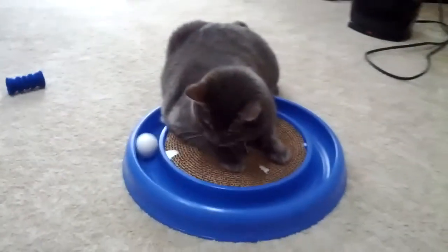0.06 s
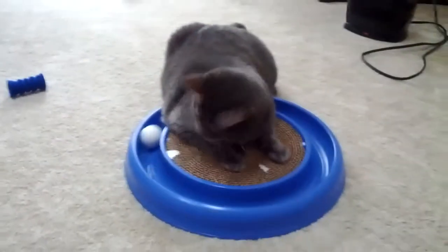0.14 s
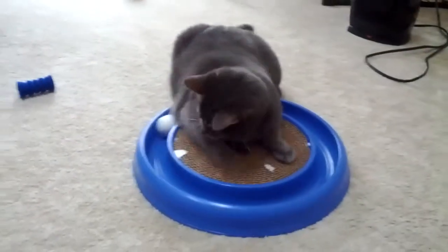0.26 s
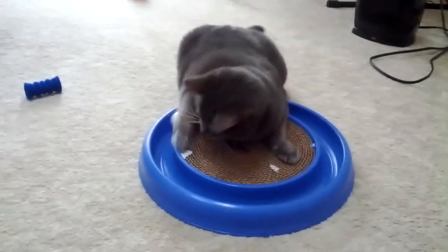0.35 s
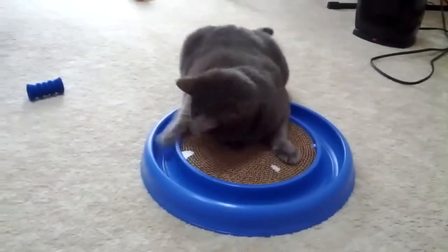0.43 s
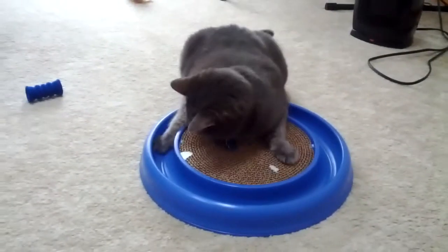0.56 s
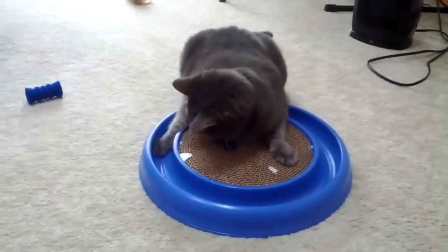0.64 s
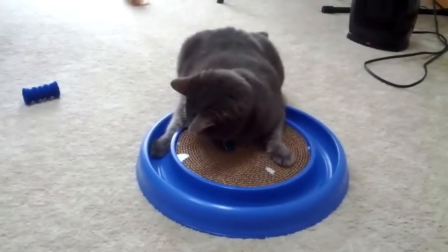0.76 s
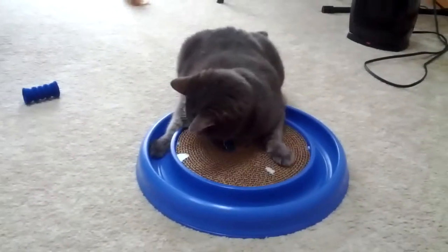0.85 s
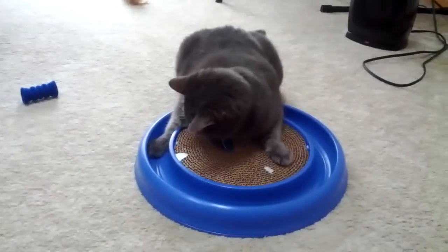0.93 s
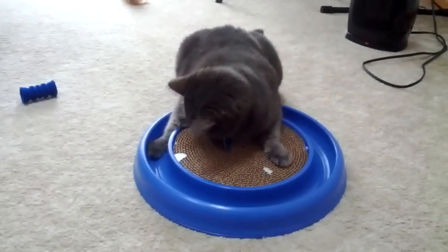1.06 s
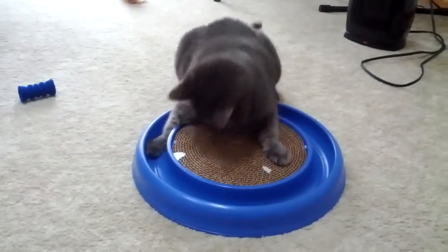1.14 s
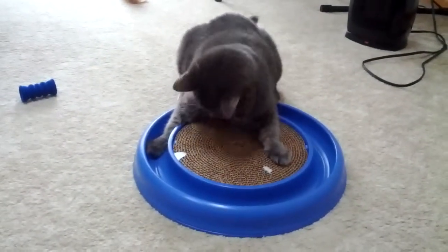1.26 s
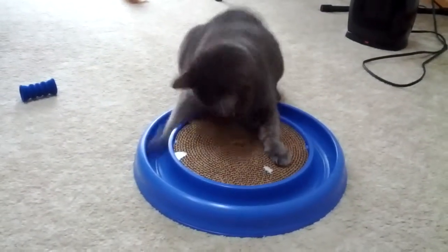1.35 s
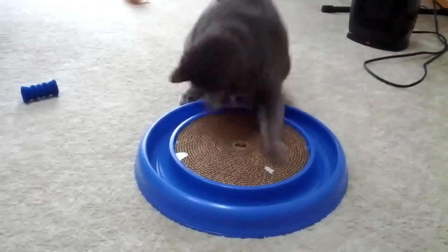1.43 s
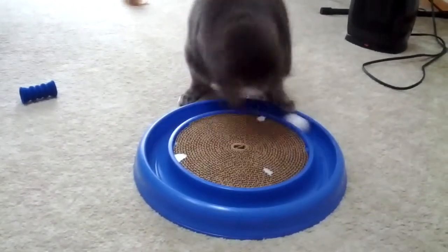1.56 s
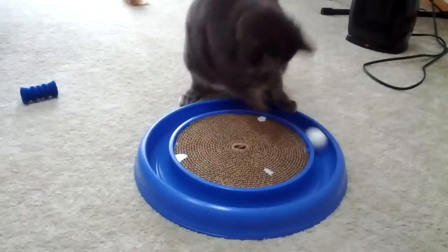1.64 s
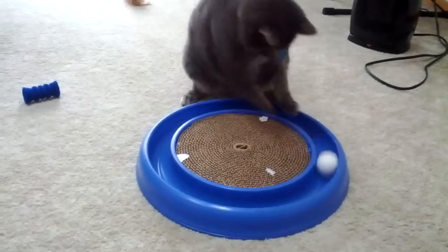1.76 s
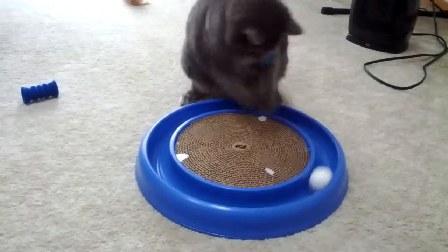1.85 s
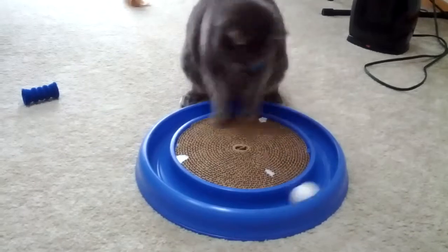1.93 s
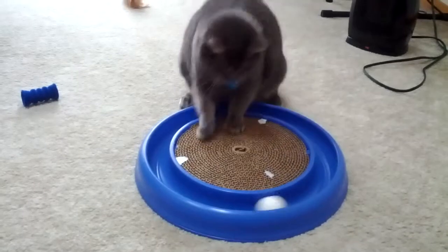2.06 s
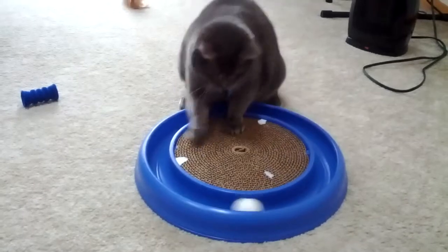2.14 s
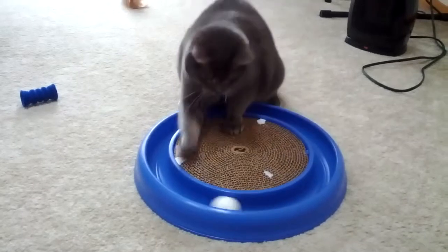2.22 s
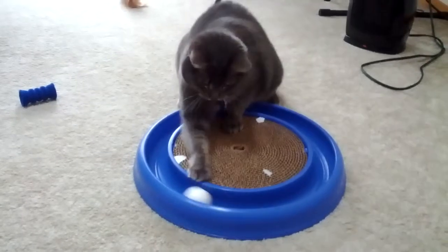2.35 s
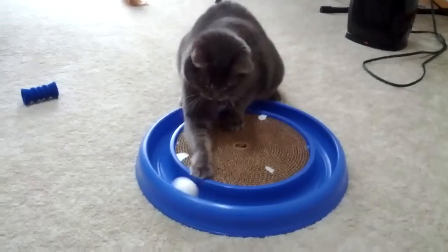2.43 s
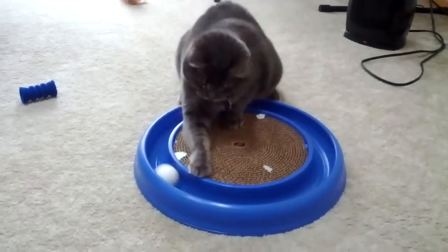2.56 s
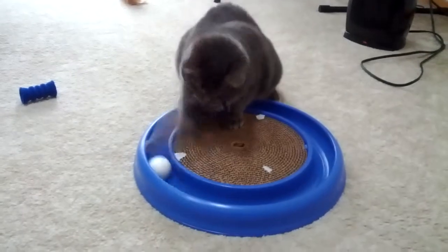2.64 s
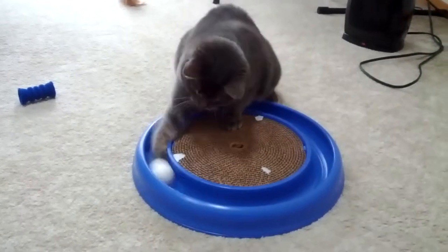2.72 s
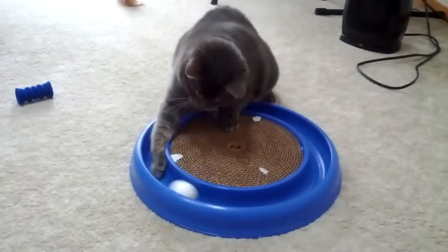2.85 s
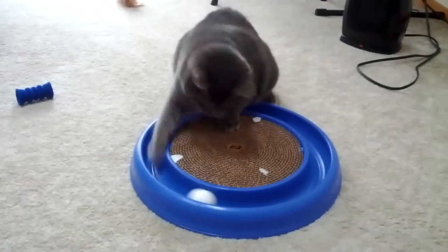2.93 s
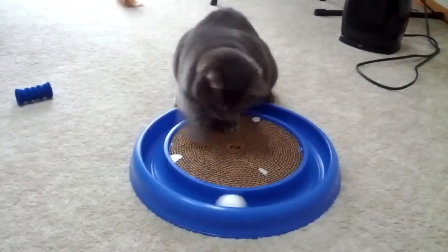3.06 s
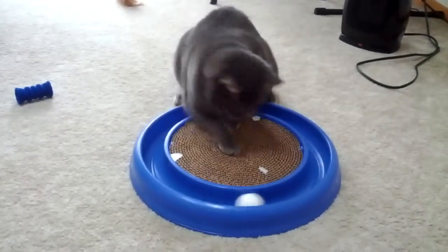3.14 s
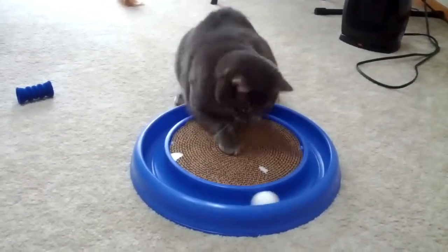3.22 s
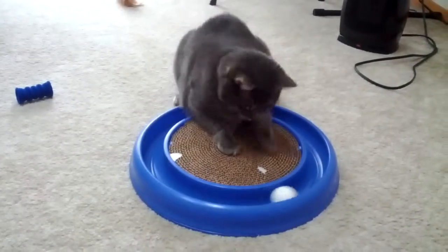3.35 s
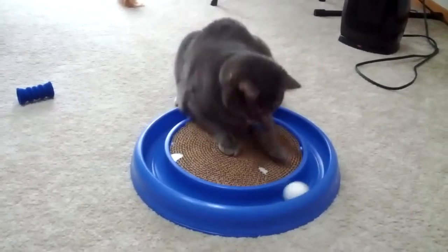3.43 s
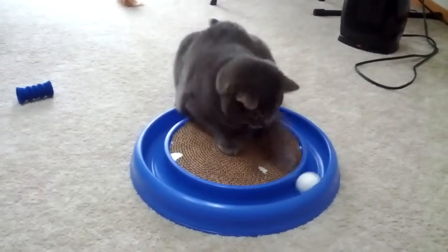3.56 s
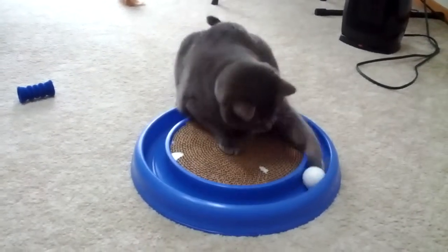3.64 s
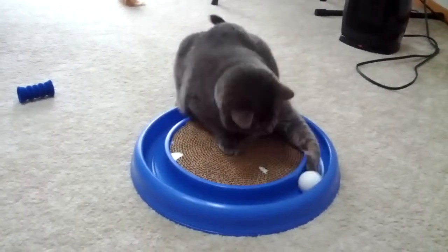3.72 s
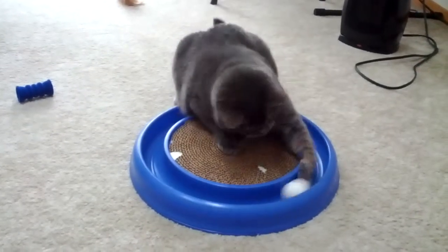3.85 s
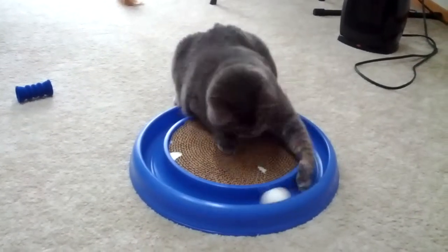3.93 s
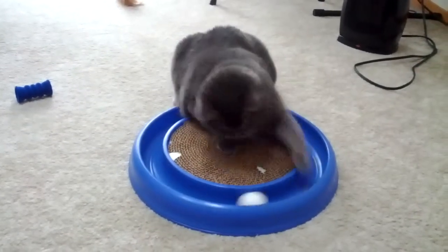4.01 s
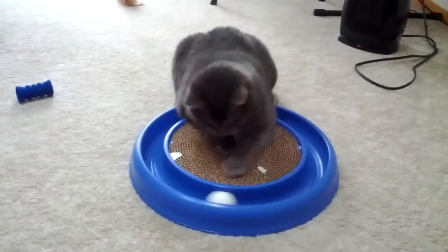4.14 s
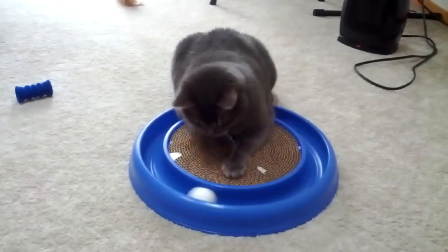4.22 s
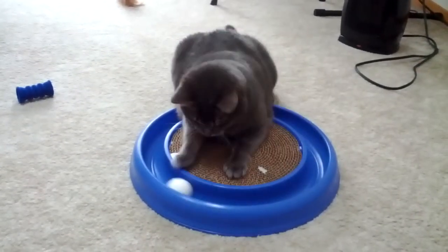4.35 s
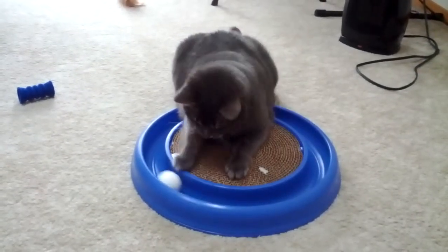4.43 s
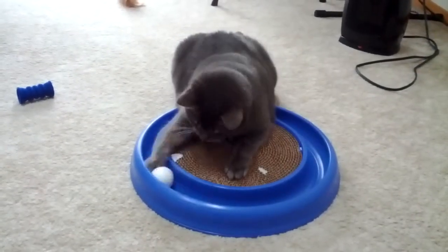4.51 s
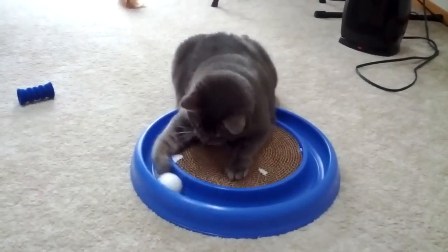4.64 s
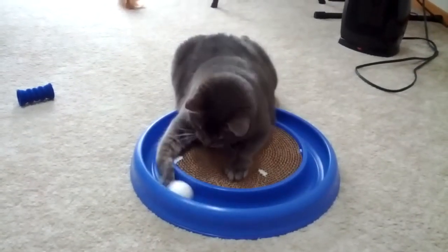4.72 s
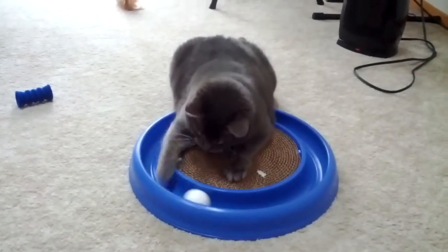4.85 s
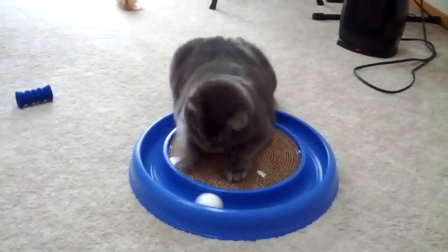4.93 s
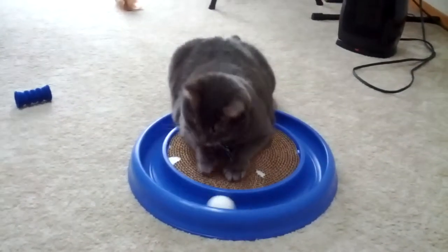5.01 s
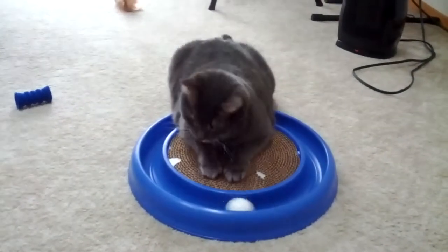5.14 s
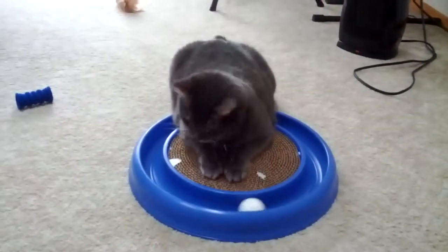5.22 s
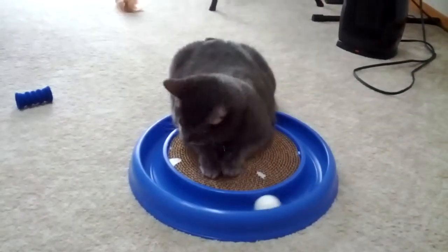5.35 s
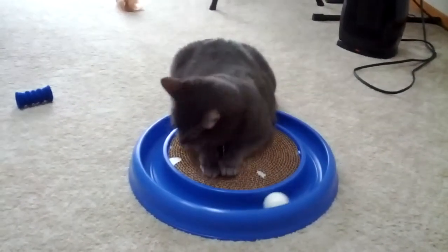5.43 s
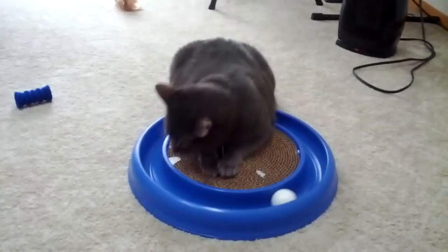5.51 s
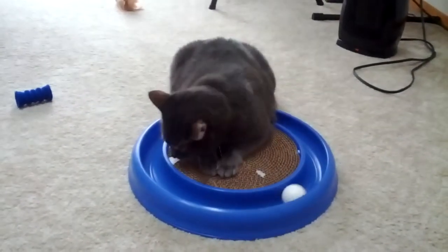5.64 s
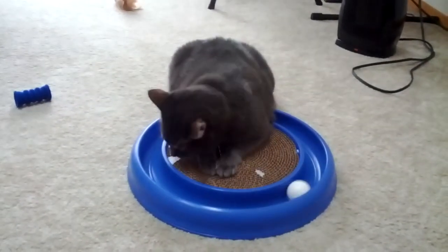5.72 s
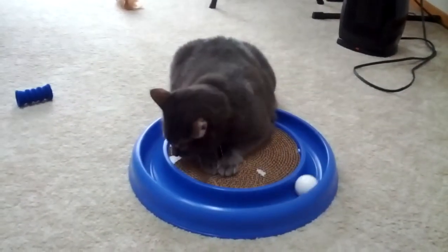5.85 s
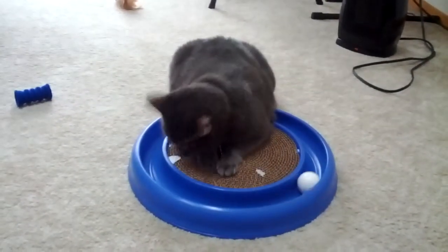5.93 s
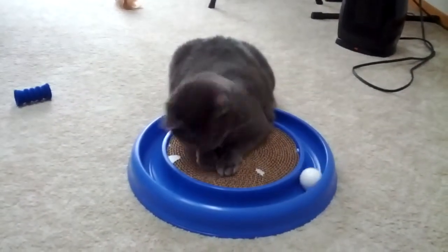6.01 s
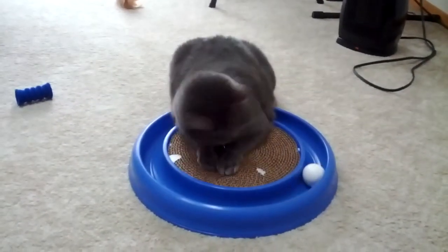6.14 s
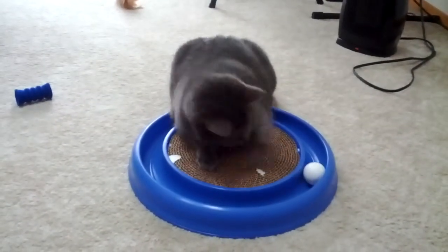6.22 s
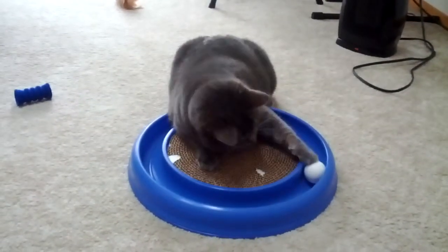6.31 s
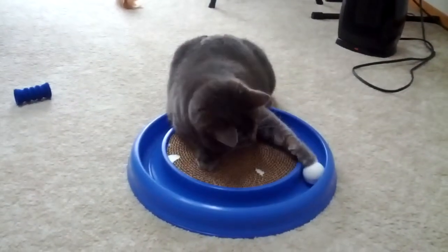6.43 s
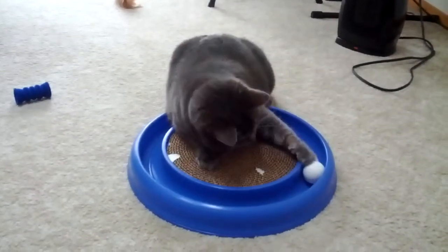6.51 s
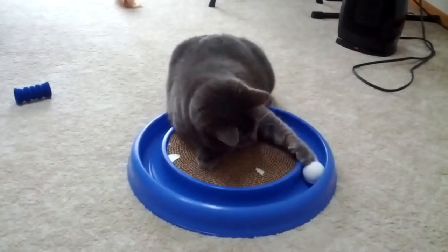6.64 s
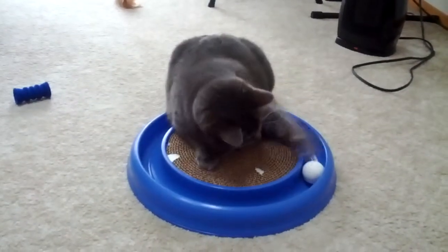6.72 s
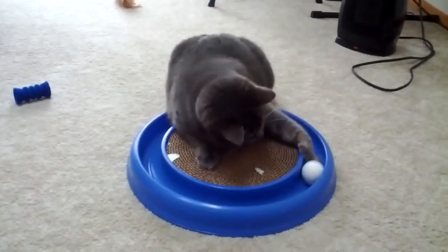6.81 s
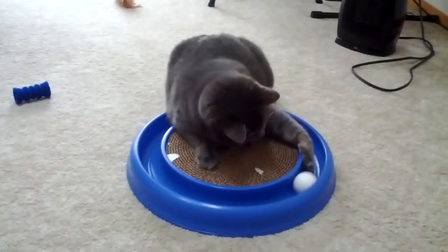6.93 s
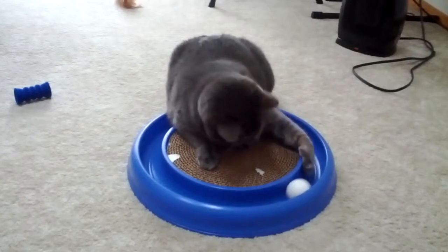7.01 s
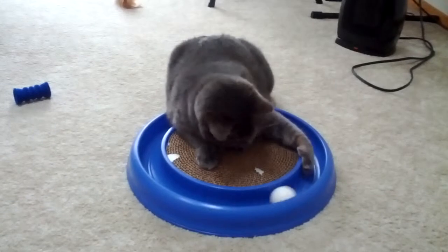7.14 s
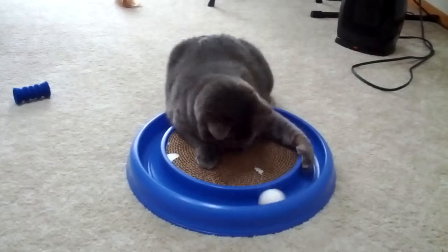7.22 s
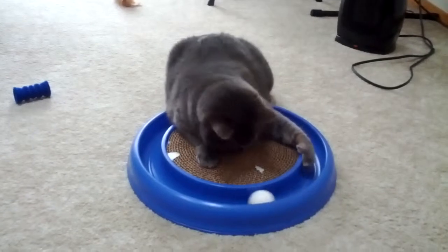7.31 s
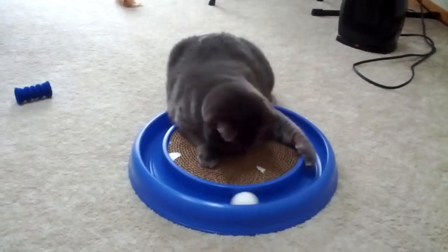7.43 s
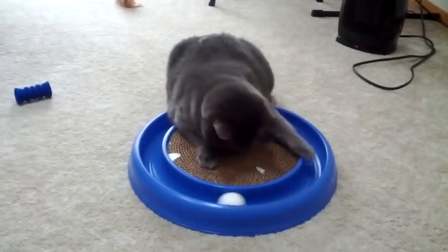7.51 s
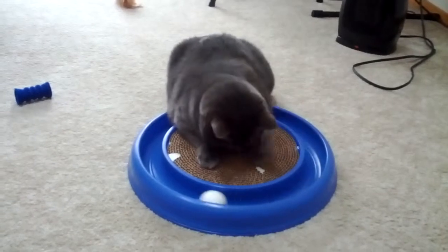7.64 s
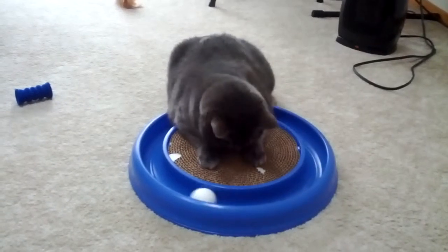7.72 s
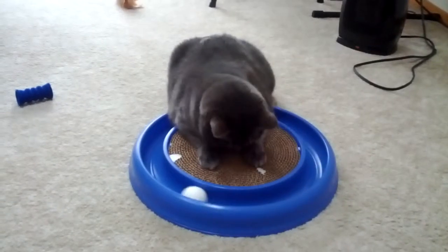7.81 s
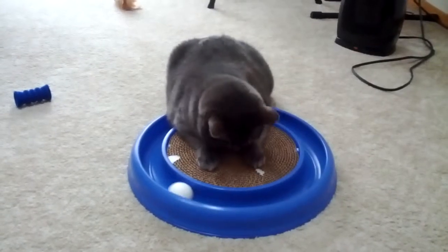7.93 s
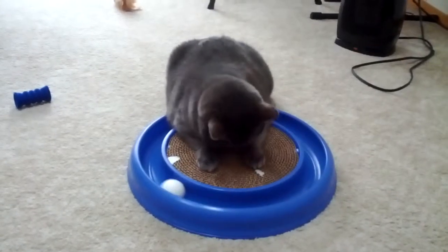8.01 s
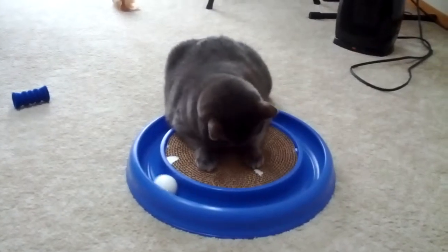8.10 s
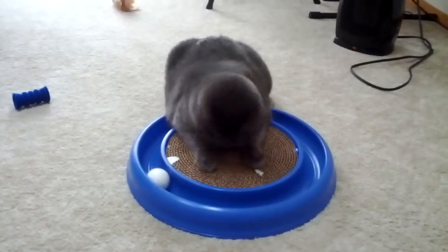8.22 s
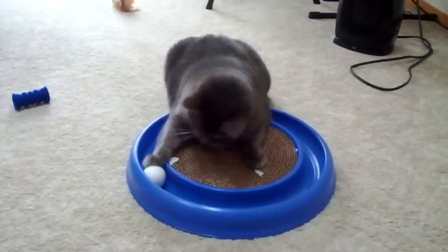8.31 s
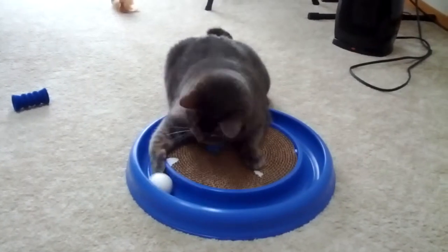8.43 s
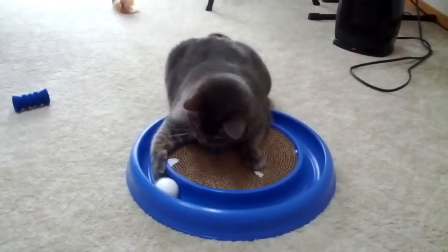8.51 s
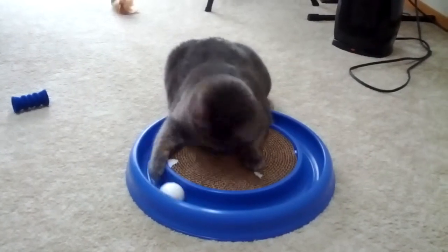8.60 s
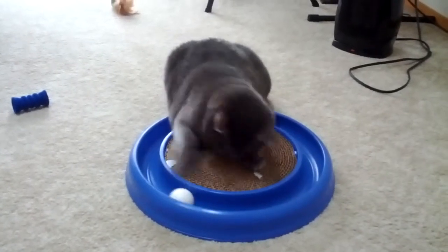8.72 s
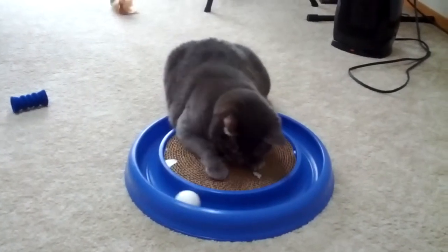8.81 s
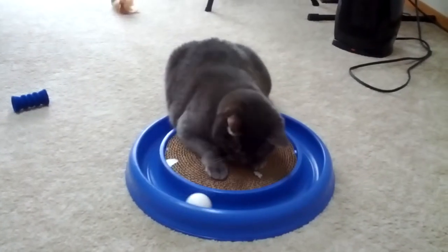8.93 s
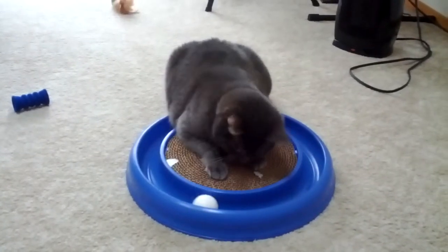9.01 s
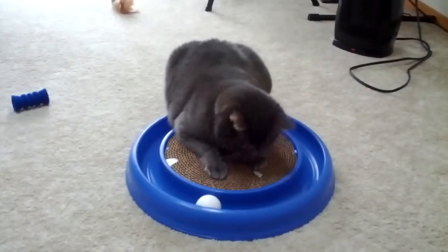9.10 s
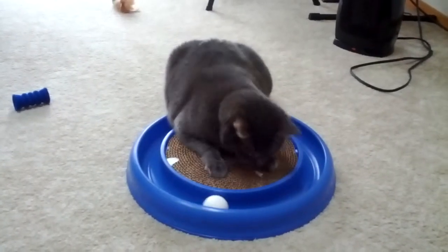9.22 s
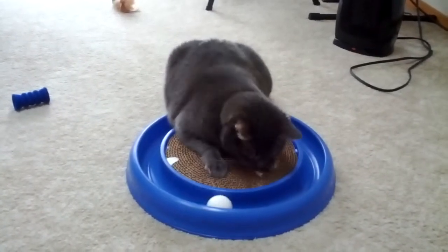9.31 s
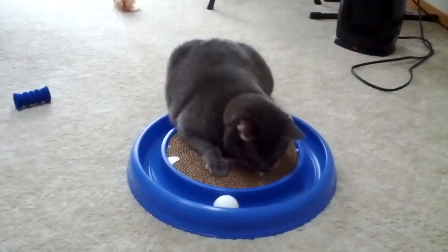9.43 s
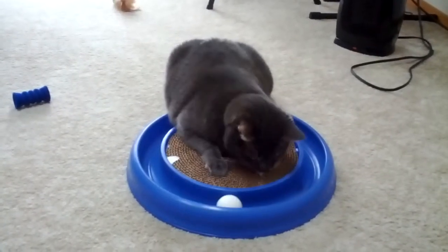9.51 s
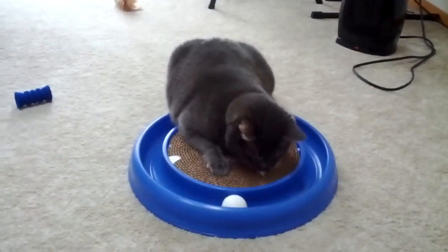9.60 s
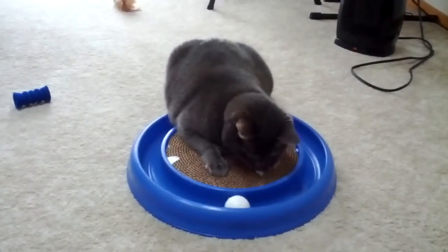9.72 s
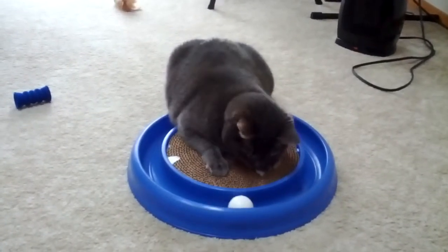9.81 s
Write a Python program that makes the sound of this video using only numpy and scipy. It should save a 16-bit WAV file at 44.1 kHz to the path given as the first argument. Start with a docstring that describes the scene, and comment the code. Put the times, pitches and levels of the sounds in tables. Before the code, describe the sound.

A quiet carpeted room with low steady air noise, very faint hum and short echo; one close microphone. A hollow plastic ball is already rolling in a ring-shaped plastic tray. A loud clack at 0.1 s starts a short run that is stopped by 0.4 s, then near quiet with faint paw brushes. At 1.4 s a hard swat brings a cluster of hollow clacks, bright skittering ticks and papery claw scrapes, then strong rumbling and chatter, with dull booms near 2.0 to 2.2 s. Rolling fades and renews at 2.7 s, and again at 3.8 s, with sharp knocks near 4.1 s. Small high collar-tag clinks stand out at 3.45 and 4.3 s. A weaker run starts at 5.2 s, almost quiet by 6 to 6.8 s. Softer rolls follow at 6.9, 7.5 and 8.2 s, with a brisk paw brush at 8.2 s and light clinks until about 9.1 s, then room quiet.

```python
"""In a quiet carpeted room, a cat on a corrugated cardboard pad bats a hollow plastic ball round a ring-shaped
plastic tray. Random bumps under the ball drum the tray and rattle its shell; blows clack, boom and tick.
Paws and claws brush the cardboard as shaped noise and tiny pricks; metal collar tags clink as
fading tones that are soon choked. Room noise, a faint hum and a short echo surround it all."""
import sys
import numpy as np
from scipy import signal
from scipy.fft import rfft, irfft, next_fast_len
from scipy.io import wavfile
from scipy.ndimage import map_coordinates

SR = 44100
rng = np.random.default_rng(int(sys.argv[2]) if len(sys.argv) > 2 else 0)


def wrap_up_sound(samples):
    """Save the sound to the file named by the first command line argument, as 16-bit audio."""
    columns = np.atleast_2d(samples).T
    # keep every value between -1 and 1, then stretch to whole-number steps
    tamed = np.clip(columns, -1, 1)
    steps = np.round(tamed * 32767).astype(np.int16)
    wavfile.write(sys.argv[1], SR, steps)


N = 434826
TIME = np.arange(N) / SR
HIT_TIME = np.arange(SR // 4) / SR  # the time axis of one hit, s


def amp(db):
    """Decibels to gain."""
    return 10 ** (np.asarray(db) / 20)


def unit(x):
    """x at rms 1."""
    return x / np.sqrt(np.mean(x ** 2) + 1e-20)


def burst(x):
    """A hit scaled to rms 1 over its first 25 ms."""
    return x / np.sqrt(np.mean(x[:SR // 40] ** 2) + 1e-20)


def along(points, hz):
    """Values between (f/Hz, value) points, read on a log frequency axis."""
    f, values = np.transpose(points)
    return np.interp(np.log(hz + 1), np.log(f), values)


def wobble(rate):
    """A smooth random curve through `rate` random points a second."""
    points = rng.standard_normal(int(N * rate / SR) + 4)
    return map_coordinates(points, [TIME * rate])


def filtered(x, response):
    """x times a complex response of frequency, with room for the ringing."""
    m = 2 * next_fast_len(len(x) // 2 + SR // 8)
    hz = np.fft.rfftfreq(m, 1 / SR)
    return irfft(rfft(x, m) * response(hz), m)[:len(x)]


def coloured(x, points):
    """x through a filter with the given spectrum, whose response never starts before the sound."""
    def response(hz):
        # folding the cepstrum forward in time gives the minimum-phase filter
        cepstrum = irfft(np.log(amp(along(points, hz))))
        cepstrum[1:len(hz) - 1] *= 2
        cepstrum[len(hz):] = 0
        return np.exp(rfft(cepstrum))
    return filtered(x, response)


def resonance(f, centre, width):
    """Response of one damped mode: it rings at its centre, and dies sooner when wider."""
    return 1j * f * width / (centre ** 2 - f * f + 1j * f * width)


def bumps(rate, spread_db):
    """Random tiny impacts, on average `rate` a second, of uneven size and either sign; rms 1."""
    size = amp(spread_db * np.clip(rng.standard_normal(N), -2, 2)) * rng.choice([-1, 1], N)
    return unit(size * (rng.random(N) < rate / SR))


def contact(t60, scatter):
    """One sharp push followed by quickly dying scatter inside the object."""
    push = scatter * rng.standard_normal(len(HIT_TIME)) * amp(-60 * HIT_TIME / t60)
    push[0] += 1
    return push


def add(track, s, sound):
    """Mix a sound into the track at time s."""
    part = track[max(round(s * SR), 0):][:len(sound)]
    part += sound[:len(part)]


# tone colour of the steady room noise: (f/Hz, level/dB)
AIR_COLOUR = [(18, -22), (30, 1), (65, 0.5), (100, -4), (150, -10.5), (280, -3.5), (450, -17),
              (1000, -21.5), (2000, -28), (4000, -30.5), (8500, -29), (11000, -25.5), (13000, -18),
              (14500, -26.5)]


def background(air_db, hum_db):
    """Steady room noise and microphone hiss are shaped noise; a faint mains hum is a 60 Hz tone."""
    air = unit(coloured(rng.standard_normal(N), AIR_COLOUR))
    hum = unit(np.sin(2 * np.pi * 60 * TIME))
    return amp(air_db) * air + amp(hum_db) * hum


# how long the room's echo takes to fall by 60 dB: (f/Hz, t60/s)
ROOM_DECAY = [(200, 0.74), (2000, 0.43), (12000, 0.31)]


def room(x):
    """The carpeted room answers with noise that fades at its own pace in each frequency band."""
    hz, t, z = signal.stft(rng.standard_normal(SR // 2), SR, nperseg=256)
    fade = amp(-60 * t / along(ROOM_DECAY, hz)[:, None])
    tail = signal.istft(z * fade, SR, nperseg=256)[1]
    tail = np.pad(tail / np.linalg.norm(tail), (SR // 200, 0))  # the echo starts 5 ms late
    return signal.fftconvolve(x, tail)[:N]


# a paw brushes over the cardboard: (middle t/s, level/dB before the overall trim, half length/s)
PAW_STROKES = [(0.27, -49.5, 0.034), (0.382, -60.5, 0.15), (1.05, -55, 0.025), (1.316, -52, 0.024),
               (1.427, -42.5, 0.028), (1.5, -43, 0.027), (1.973, -49, 0.016), (2.105, -46.5, 0.013),
               (2.302, -45, 0.025), (2.584, -50, 0.0096), (2.716, -51, 0.027), (3.11, -51, 0.01),
               (3.204, -58, 0.013), (3.455, -50, 0.024), (3.532, -65, 0.03), (3.819, -49.5, 0.016),
               (4.124, -50.5, 0.021), (4.368, -55, 0.04), (5.24, -57.5, 0.018), (5.494, -58, 0.022),
               (5.867, -57.5, 0.02), (6.181, -50.5, 0.0096), (6.826, -59, 0.021), (7.647, -54, 0.0094),
               (8.229, -44.5, 0.013), (8.325, -51.5, 0.019), (8.8, -62, 0.02), (9.12, -56, 0.031)]
# tone colour of the brushing hiss: (f/Hz, level/dB)
BRUSH_COLOUR = [(2000, -36), (4000, -3), (6000, -10), (7600, -7.5), (9000, -7), (10500, -4.5), (12300, -1),
                (14000, -9), (16000, -11.5)]
# tone colour of the lower, rougher rasp: (f/Hz, level/dB)
RASP_COLOUR = [(300, -27), (900, -10.5), (2000, -13), (4000, -5.5), (7000, -22.5), (14000, -33)]
RASP_DB_PER_HALVING, STROKE_S = 1.5, 0.03  # strokes quicker than this half length dig in and rasp more


def paws(level_db, rasp_db):
    """Fur and claws catch on countless paper edges: tiny bumps swell and fade with each stroke."""
    hiss, rasp = np.zeros(N), np.zeros(N)
    for s, db, half in PAW_STROKES:
        swell = amp(db + level_db) * np.exp(-.5 * ((TIME - s) / half) ** 2)
        halvings = np.clip(np.log2(STROKE_S / half), -1, 1)
        hiss += swell
        rasp += swell * amp(rasp_db + RASP_DB_PER_HALVING * halvings)
    flutter = unit(amp(2.9 * wobble(260)))  # the brushing flutters irregularly
    fibres = bumps(rate=7000, spread_db=-4)
    hiss *= unit(coloured(fibres, BRUSH_COLOUR))
    rasp *= unit(coloured(fibres, RASP_COLOUR))
    return flutter * (hiss + rasp)


# tone colour of thin, bright ticks, for claw pricks here and the skittering ball below: (f/Hz, level/dB)
SKID_COLOUR = [(2000, -27), (5000, -6), (8000, -15), (9500, 9.5), (11200, 10), (12600, 9.5), (14000, 0),
               (16000, -13)]


def claws(level_db):
    """Claw tips prick the cardboard faintly, at random moments, as the cat shifts its weight."""
    pricks = signal.fftconvolve(bumps(rate=6, spread_db=3), contact(t60=.02, scatter=.18))[:N]
    return amp(level_db) * unit(coloured(pricks, SKID_COLOUR))


def ring(modes):
    """Damped tones of a metal tag, a little different in pitch and level at every touch."""
    detune = .0015 * rng.standard_normal(len(modes))
    out = np.zeros(len(HIT_TIME))
    for d, (hz, db, t60) in zip(detune, modes):
        fade = amp(db + 2 * rng.standard_normal() - 60 * HIT_TIME / t60)
        out += fade * np.sin(2 * np.pi * hz * (1 + d) * HIT_TIME)
    return out


# the collar tags clink: (t/s before a small lag, ring level/dB and clash level/dB before trims,
# free ringing/s until the tags damp each other)
TAG_CLINKS = [(0.3178, -19.5, -37, 0.0094), (0.3314, -25, -62, 0.0097), (1.071, -24, -30, 0.006),
              (1.4494, -12.5, -49, 0.0068), (3.237, -19, -34, 0.0089), (3.2499, -20.5, -44, 0.006),
              (3.3515, -24, -33, 0.0071), (3.3987, -34, -59, 0.023), (3.4396, -27, -50.5, 0.013),
              (3.4529, -9.5, -29.5, 0.0065), (4.2858, -9.5, -21.5, 0.012), (6.0058, -21, -33.5, 0.0075),
              (6.0263, -50, -44, 0.0076), (6.4797, -22.5, -45, 0.0019), (6.6453, -37, -53, 0.014),
              (7.0775, -27, -49, 0.0053), (8.2377, -32, -30.5, 0.005), (8.5101, -29.5, -39, 0.009),
              (8.523, -26, -38, 0.015), (8.5436, -30, -45, 0.026), (8.5749, -23, -45, 0.004),
              (8.6858, -31, -43.5, 0.0075), (9.0859, -25, -45, 0.0034), (9.1375, -18.5, -47, 0.013)]
# high tones of the tags: (f/Hz, level/dB before random changes, t60/s while free)
TAG_HIGH_TONES = [(10900, -18.5, 0.18), (12000, -10.5, 0.13), (12260, 1, 0.082), (12300, -33, 0.031)]
# lower tones that grow with the clash: (f/Hz, level/dB before random changes, t60/s while free)
TAG_LOW_TONES = [(7240, -12, 0.2), (7570, -19.5, 0.1)]
# tone colour of the tick as metal meets metal: (f/Hz, level/dB)
TAG_TICK_COLOUR = [(1000, -65), (2700, -2.5), (5000, 1.5), (8000, 2.5), (11000, 7.5), (13000, 2),
                   (16000, 8)]


def tags(high_db, low_db, tick_db, choke_t60, lag):
    """Tags strike, ring freely, then lie together and choke; a harder clash ticks and rings low more."""
    out = np.zeros(N)
    for s, ring_level, clash_level, free in TAG_CLINKS:
        choke = amp(-60 * np.maximum(HIT_TIME - free, 0) / choke_t60)
        high = choke * ring(TAG_HIGH_TONES)
        low = choke * ring(TAG_LOW_TONES)
        tick = coloured(contact(t60=0.024, scatter=0.14), TAG_TICK_COLOUR)
        clash = amp(low_db) * burst(low) + amp(tick_db) * burst(tick)
        clink = amp(ring_level + high_db) * high / np.abs(high).max()
        add(out, s + lag, clink + amp(clash_level) * clash)
    return out


# ringing of the plastic tray, also drummed by the rolling ball below: (f/Hz, width/Hz, level/dB)
TRAY_MODES = [(123.4, 13, -12), (172, 9.8, -6), (219.5, 37, -8), (250.2, 26, -1.5), (290.6, 27.7, -1.5),
              (319, 25, -4.5), (355.3, 20.7, -5.5), (369, 13, -6), (481.2, 28, -12), (545.7, 39, -13.5),
              (703, 27, -29.5)]


def tray(x, scatter_db):
    """The tray rings in several modes; their strength and sign vary at random from hit to hit."""
    count = len(TRAY_MODES)
    gains = amp(scatter_db * rng.standard_normal(count)) * rng.choice([-1, 1], count)

    def response(f):
        return sum(g * amp(db) * resonance(f, hz, width)
                   for g, (hz, width, db) in zip(gains, TRAY_MODES))
    return filtered(x, response)


# soft, dull booms of the tray, from a paw or from the rolling ball: (t/s, level/dB before the overall trim)
TRAY_THUMPS = [(0.045, -32), (0.378, -30.5), (0.404, -35.5), (1.117, -43), (2.032, -27), (2.174, -25.5),
               (3.108, -35), (3.992, -24), (4.091, -27.5), (5.235, -41.5), (5.335, -29.5), (5.49, -31),
               (5.816, -39), (6.055, -44.5), (6.901, -34), (7.203, -31.5), (8.301, -33.5), (9.205, -46)]


def thumps(level_db, push_t60, dull_hz):
    """A push with its treble taken away sets the tray booming softly, without any clack."""
    out = np.zeros(N)
    for s, db in TRAY_THUMPS:
        push = contact(push_t60, scatter=0.06)
        push = filtered(push, lambda f: 1 / (1 + 1j * f / dull_hz) ** 3)
        add(out, s, amp(db + level_db) * burst(tray(push, scatter_db=4)))
    return out


SPEED_UP_S = 0.035  # a push brings the ball up to speed
CHECK_DB_PER_S = 112  # extra fade once a paw has caught the ball


def coasting(start, end, fade):
    """Gain of one run: the ball speeds up, slows by friction (fade in dB/s) and is checked at the end."""
    age = np.maximum(TIME - start, 0)
    slowing_db = -fade * age - CHECK_DB_PER_S * np.maximum(TIME - end, 0)
    return np.minimum(age / SPEED_UP_S, 1) * amp(slowing_db)


# each push sets the ball coasting until a paw checks it or pushes again:
# (start t/s, end t/s, tray rumble level/dB, chatter level/dB; levels before fades and trims)
BALL_PUSHES = [(-0.05, 0.06, -44, -52.5), (0.104, 0.4, -47.5, -57), (1.08, 1.366, -53.5, -67),
               (1.384, 1.95, -42, -47), (1.894, 2.674, -42.5, -52.5), (2.687, 3.62, -43, -56),
               (3.823, 5.06, -42.5, -50), (5.168, 5.885, -47.5, -61.5), (5.903, 6.573, -60.5, -70),
               (6.852, 7.557, -45.5, -58), (7.52, 8.25, -49, -60), (8.235, 9.297, -53, -63)]
RUMBLE_FADE_DB_PER_S, CHATTER_FADE_DB_PER_S = 6.5, 8  # the hopping dies before the rumble does


def motion():
    """Strength of the rumble and of the chatter: at each moment the strongest push counts."""
    rumbles = [amp(db) * coasting(start, end, RUMBLE_FADE_DB_PER_S) for start, end, db, _ in BALL_PUSHES]
    chatters = [amp(db) * coasting(start, end, CHATTER_FADE_DB_PER_S) for start, end, _, db in BALL_PUSHES]
    return np.max(rumbles, axis=0), np.max(chatters, axis=0)


def clack(spot_hz, spot_db, width_hz, t60, scatter):
    """A contact on hollow plastic, pitched by the struck spot; 50 ms long, peak 1."""
    push = contact(t60, scatter)[:SR // 20]
    hz = np.fft.rfftfreq(len(push), 1 / SR)
    spot = 1 + amp(spot_db) * resonance(hz, spot_hz, width_hz)
    ringing = irfft(rfft(push) * spot, len(push))
    return ringing / np.abs(ringing).max()


def rattles(median_rate, spread_db, centre_hz):
    """Single hops of the rolling ball at uneven gaps, each on another patch of plastic; rms 1."""
    out = np.zeros(N)
    draws = rng.standard_normal((1100, 3))
    times = np.cumsum(np.exp(.7 * draws[:, 0])) / median_rate  # the median gap is 1 / median_rate
    for s, (_, size, pitch) in zip(times[times < TIME[-1]], draws):
        spot_hz = centre_hz * np.exp(0.55 * np.clip(pitch, -2, 1.4))
        hop = clack(spot_hz, spot_db=5, width_hz=260, t60=.025, scatter=.13)
        add(out, s, amp(spread_db * np.clip(size, -2, 1.5)) * hop)
    return unit(out)


# tone colour of the chattering ball shell: (f/Hz, level/dB)
CHATTER_COLOUR = [(250, -17), (600, 8), (900, 2.5), (1400, 1.5), (2000, -1.5), (2600, -4), (3400, -13),
                  (4200, -18), (5100, -8.5), (5900, -13), (6700, -10), (8500, -17), (12000, -4),
                  (16000, -52)]


def rolling(rumble, chatter, rumble_db, chatter_db, grit_db):
    """Small bumps under the ball drum the tray and rattle the ball's shell."""
    unevenness = wobble(32)
    drum = np.zeros(N)
    # the contact point keeps moving, so each mode gets its own drumming
    for hz, width, db in TRAY_MODES:
        drum += filtered(bumps(rate=900, spread_db=2),
                         lambda f: amp(db) * resonance(f, hz, width) * resonance(f, hz, 5 * width))
    hops = rattles(median_rate=85, spread_db=2.5, centre_hz=1454)
    grit = amp(grit_db) * bumps(rate=2500, spread_db=0)
    shell = unit(coloured(hops + grit, CHATTER_COLOUR))
    rumble_gain = rumble * amp(rumble_db + 3.25 * unevenness)
    chatter_gain = chatter * amp(chatter_db + 3.2 * unevenness)
    return rumble_gain * unit(drum) + chatter_gain * shell


# the ball skitters along the wall after a hard swat:
# (start t/s, end t/s, level/dB before the fade and overall trim, fade/dB per s)
BALL_SKITTERS = [(1.404, 1.645, -35, 38), (1.654, 1.92, -40.5, 108)]


def skitter(level_db, median_rate, spread_db):
    """The swatted ball hops along the wall in quick, uneven, fading runs of ticks."""
    out = np.zeros(N)
    for start, end, db, fade in BALL_SKITTERS:
        draws = rng.standard_normal((80, 2))
        times = start + np.cumsum(np.exp(0.83 * draws[:, 0])) / median_rate
        hops = np.zeros(N)
        for s, size in zip(times[times < end], np.clip(draws[:, 1], -2, 1)):
            add(hops, s, amp(spread_db * size) * contact(t60=0.027, scatter=0.14))
        hops = coloured(hops, SKID_COLOUR)
        hops /= np.std(hops[(TIME > start) & (TIME < end)])
        out += amp(db + level_db - fade * np.maximum(TIME - start, 0)) * hops
    return out


JOSTLES_PER_S, JOSTLE_DB, JOSTLE_TICK_DB = 7, 15, -18  # average rate; clack over chatter; tick over clack


def jostles(chatter, spread_db, centre_hz):
    """Light chance knocks of the rolling ball on the wall, harder when it runs fast; rows like BALL_KNOCKS."""
    draws = rng.uniform(-1, 1, (90, 3))
    times = np.cumsum(1 + draws[:, 0]) / JOSTLES_PER_S
    chatter_level = 20 * np.log10(np.interp(times, TIME, chatter) + 1e-9)
    levels = chatter_level + JOSTLE_DB + spread_db * draws[:, 1]
    pitches = centre_hz * 2 ** (0.73 * draws[:, 2])
    rows = np.column_stack([times, levels, levels + JOSTLE_TICK_DB, pitches])
    return rows[times < TIME[-1]]


# tone colour of the hollow clack: (f/Hz, level/dB)
CLACK_COLOUR = [(100, 0), (400, -10.5), (750, 1.5), (1400, 1), (2200, 7), (3300, -2), (4600, 5.5),
                (5600, 0.5), (8000, 7), (16000, -17)]
# tone colour of the hard tick: (f/Hz, level/dB)
TICK_COLOUR = [(1000, -80), (4000, -14), (7000, -2), (9000, 2), (11500, 9), (13000, 8), (16000, 9)]
BOOM_GROWTH = 0.67  # dB of tray boom for each dB of clack: gentle blows are mostly boom
BOOM_DB_PER_OCTAVE, RIM_HZ = -0.5, 793  # spots stiffer and higher than the rim shake the tray less
TICK_HZ = 11300  # ring of a hard contact, before a random shift
DULLING, FIRM_TICK_DB = 0.3, -36  # dB of clack bandwidth per dB of tick; tick of an ordinary firm contact


def knocks(blows, clack_db, boom_db, tick_db, soft_hz, tick_delay, lag):
    """Each blow gives a hollow clack and the boom of the tray and, a moment later, a hard tick."""
    out = np.zeros(N)
    for s, clack_level, tick_level, spot_hz in blows:
        hollow = clack(spot_hz, spot_db=8.5, width_hz=410, t60=0.028, scatter=0.12)
        hollow = coloured(hollow, CLACK_COLOUR)
        # a soft contact has little tick and a dull clack; a hard contact is bright
        edge_hz = soft_hz * amp(DULLING * (tick_level - FIRM_TICK_DB))
        hollow = filtered(hollow, lambda f: 1 / (1 + 1j * f / edge_hz) ** 2)

        boom_level = BOOM_GROWTH * clack_level + BOOM_DB_PER_OCTAVE * np.log2(spot_hz / RIM_HZ)
        boom = tray(contact(t60=0.014, scatter=0.05), scatter_db=2.5)

        tick = coloured(contact(t60=0.031, scatter=0.12), TICK_COLOUR)
        tick_hz = TICK_HZ + 700 * rng.uniform(-1.1, 1)
        tick = filtered(tick, lambda f: 1 + 3.5 * resonance(f, tick_hz, 2200))

        add(out, s + lag, amp(clack_level + clack_db) * hollow / np.abs(hollow).max())
        add(out, s + lag, amp(boom_level + boom_db) * burst(boom))
        add(out, s + lag + tick_delay, amp(tick_level + tick_db) * burst(tick))
    return out


# ball and claws strike the plastic:
# (t/s before a small lag, clack level/dB and hard tick level/dB before trims, struck spot f/Hz)
BALL_KNOCKS = [(0.121, -10.5, -26.5, 1130), (0.127, -26, -43, 875), (1.387, -22.5, -30, 1880),
               (1.393, -15, -34, 886), (1.407, -19, -37, 781), (1.446, -17, -25, 795),
               (1.467, -12, -39, 1530), (1.477, -21, -44, 1610), (1.4955, -16, -22, 2310),
               (1.501, -22.5, -54, 2130), (1.542, -27, -56, 2020), (1.664, -24.5, -30, 940),
               (1.965, -27, -28, 1390), (1.984, -26, -58, 1260), (2.004, -20.5, -58, 845),
               (2.063, -29.5, -50, 1290), (2.101, -22, -54, 1140), (2.108, -20, -35.5, 1730),
               (2.17, -14.5, -25, 770), (2.427, -37, -57, 711), (2.713, -28.5, -40, 724),
               (2.743, -24.5, -55, 1700), (2.772, -30, -38, 703), (2.789, -33.5, -47, 1130),
               (2.882, -36, -35, 721), (3.005, -35.5, -43, 1390), (3.065, -27.5, -37, 1550),
               (3.083, -25.5, -46, 1020), (3.656, -36, -34, 1580), (3.77, -37.5, -74, 880),
               (3.853, -39, -51, 796), (3.992, -20.5, -40, 870), (4.071, -17.5, -17.5, 1900),
               (4.086, -17.5, -29, 910), (4.285, -29.5, -45, 786), (4.399, -19, -40, 730),
               (4.534, -33.5, -44.5, 845), (4.595, -32.5, -66, 1610), (4.711, -35.5, -73, 1000),
               (4.815, -26.5, -40, 1560), (4.86, -33, -43, 977), (4.914, -37, -54, 1500),
               (5.331, -25, -52, 1280), (5.62, -37, -56.5, 726), (5.817, -46.5, -62, 1420),
               (5.93, -26.5, -32.5, 3300), (6.053, -40.5, -49, 1720), (6.47, -38, -53, 1070),
               (6.778, -45, -51, 2190), (7.193, -29, -56, 1420), (7.302, -37.5, -58, 840),
               (7.597, -32, -50.5, 953), (7.694, -28, -52, 1060), (7.732, -29, -44, 840),
               (7.919, -33.5, -49, 791), (8.278, -26, -45, 754), (8.296, -27.5, -47, 1860),
               (9.008, -33.5, -71, 900), (9.135, -36, -42, 2620), (9.142, -32.5, -39, 3000)]


def scene():
    """Toy, cat and collar in the room; the cat's body screens the collar from the walls."""
    rumble, chatter = motion()
    toy = rolling(rumble, chatter, rumble_db=-1.0, chatter_db=-1.0, grit_db=-0.5)
    toy += skitter(level_db=-3.5, median_rate=140, spread_db=0.5)
    blows = [*BALL_KNOCKS, *jostles(chatter, spread_db=9, centre_hz=1310)]
    # tick_delay and lag are in seconds
    toy += knocks(blows, clack_db=-1.5, boom_db=-27, tick_db=-13.5, soft_hz=6240, tick_delay=.0005, lag=.001)
    toy += thumps(level_db=-9.5, push_t60=0.0054, dull_hz=1110)
    cat = paws(level_db=2, rasp_db=-7.5) + claws(level_db=-72)
    collar = tags(high_db=-6.0, low_db=-20, tick_db=-14.0, choke_t60=0.026, lag=0.00041)
    echo = room(amp(-12.0) * (toy + cat) + amp(-15.5) * collar)
    mix = toy + cat + collar + echo + background(air_db=-58, hum_db=-75.0)
    return mix[None]  # one channel


TOP_HZ = 15900  # band limit of the microphone channel


def record(dry):
    """The microphone channel keeps nothing at or above its band limit."""
    return np.array([filtered(channel, lambda hz: hz < TOP_HZ) for channel in dry])


dry = scene()
out = record(dry)
wrap_up_sound(out)
```